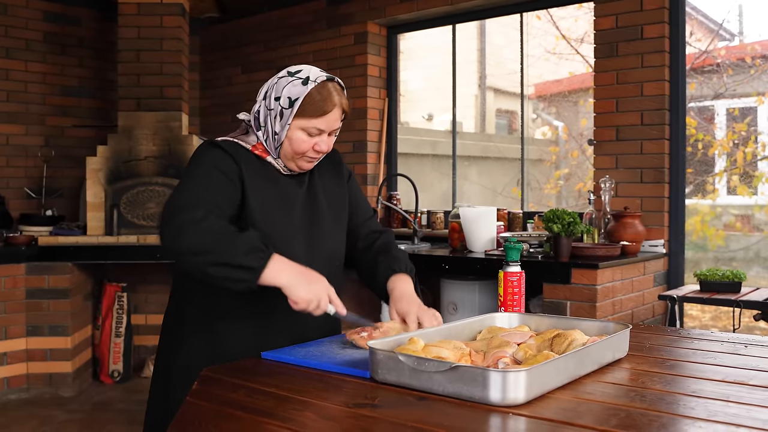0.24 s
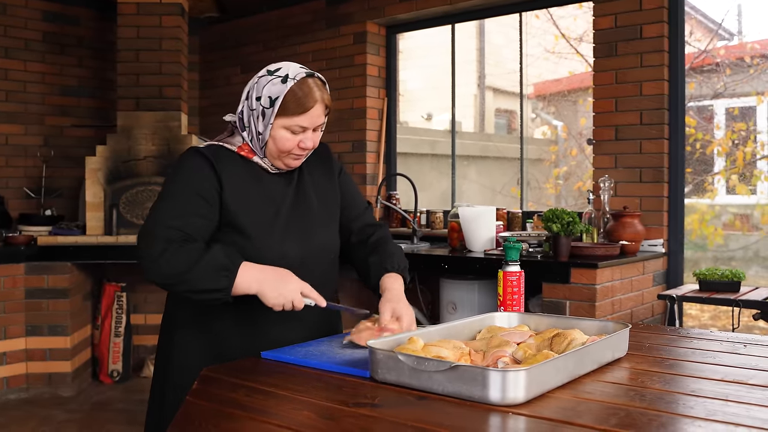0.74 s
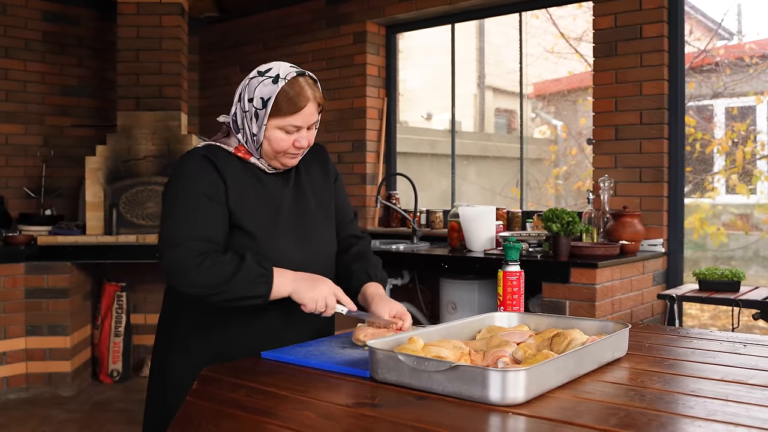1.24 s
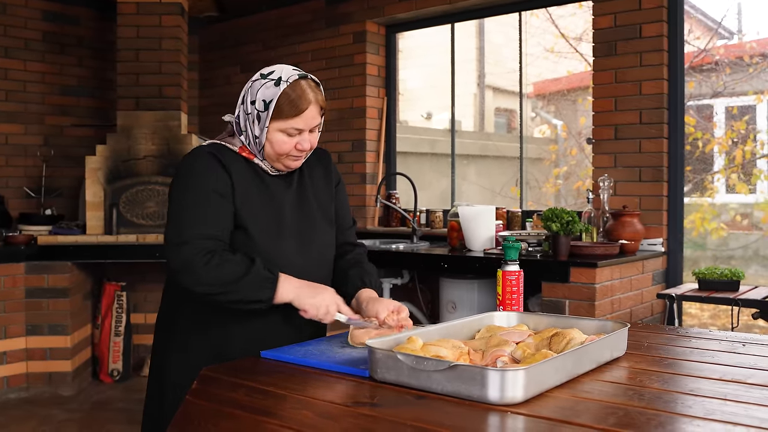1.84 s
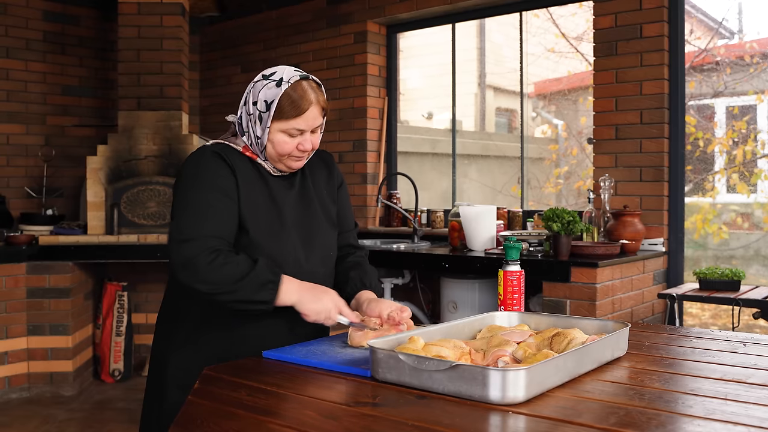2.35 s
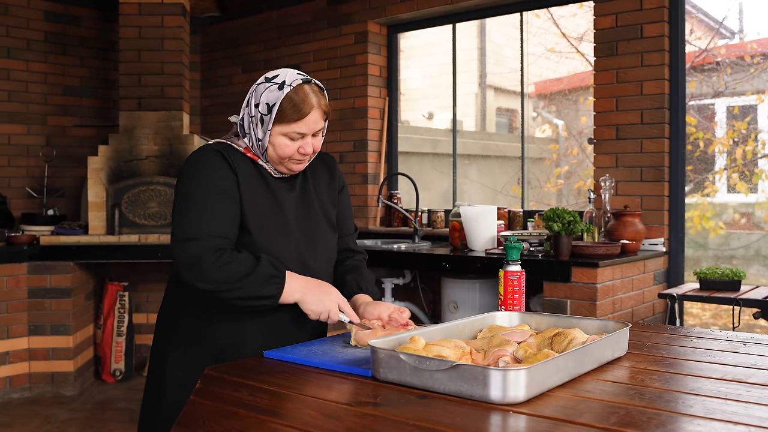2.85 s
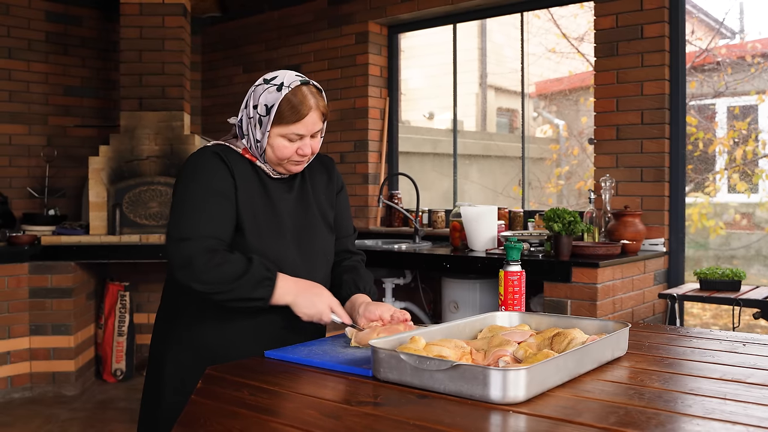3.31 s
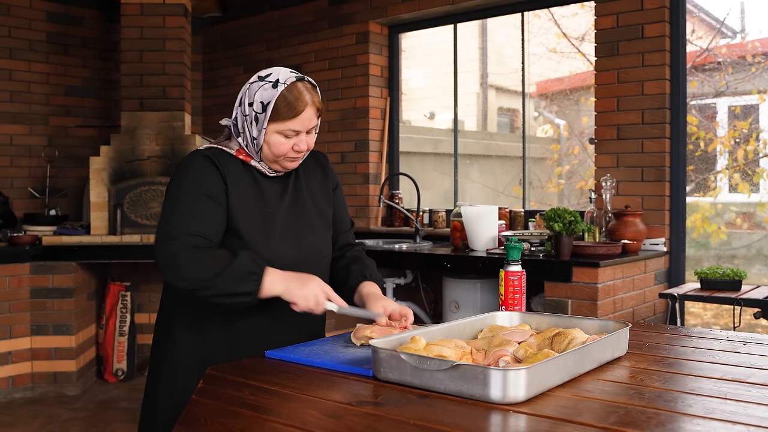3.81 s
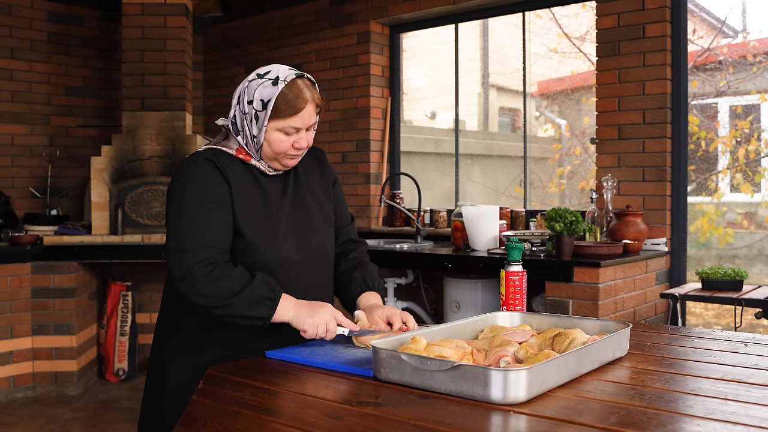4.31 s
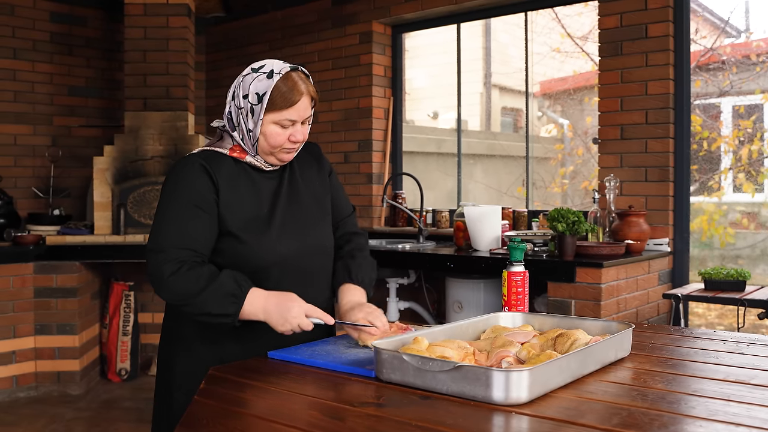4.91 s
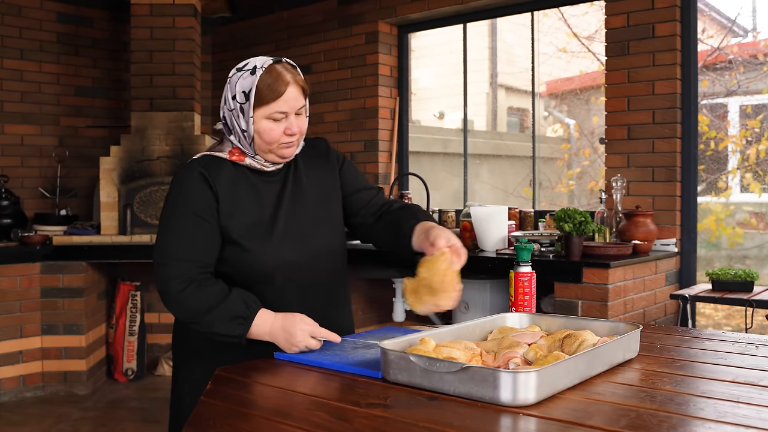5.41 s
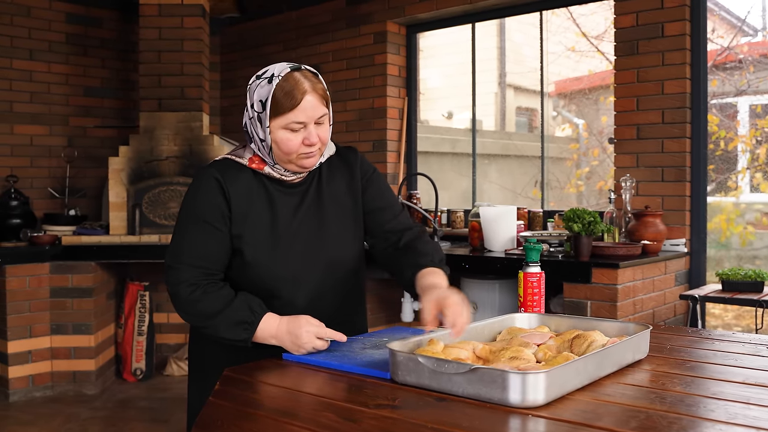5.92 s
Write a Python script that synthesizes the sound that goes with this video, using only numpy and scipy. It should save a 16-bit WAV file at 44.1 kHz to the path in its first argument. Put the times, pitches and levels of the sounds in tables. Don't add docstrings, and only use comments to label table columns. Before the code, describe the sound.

A faint room tone and wide, soft water hiss run throughout, with bright ticking drips at left and right and occasional dull splats. At 0.1 s a hand thumps the wooden table with a light scrape; another thump and low rub come at 0.5 s, with tiny high sparrow notes. A chirp sounds at 0.9 s, then a thump at 1.1 s. Around 1.15 s the yard sound drops away for about 0.05 s and returns. Far whistles begin at 1.8 s. From 2.1 to 2.5 s the knife scrapes and taps the board in quick clusters. Sparrows chirp at right near 2.9, 3.2, 3.8, 4.5 and 5.0 s, while whistles continue until 3.8 s and knife work thins to faint rubs and thumps. At 5.82 s a sharp, loud tray knock cracks, rings and booms off brick, the table humming beneath. Two much softer blows follow near 6.1 s.

```python
import sys
import numpy as np
from scipy import signal
from scipy.fft import rfft, irfft
from scipy.io import wavfile
from scipy.ndimage import uniform_filter1d

SR = 44100
rng = np.random.default_rng(int(sys.argv[2]) if len(sys.argv) > 2 else 0)


def master(y):
    cut = np.clip(np.atleast_2d(y).T, -1, 1)
    pcm = np.round(cut * 32767)
    wavfile.write(sys.argv[1], SR, pcm.astype(np.int16))


def natural_amplitude(level_db):
    exponent = np.asarray(level_db, float) / 20
    return 10 ** exponent


N = 271636

# freq_hz, density_db
ROOM_TONE = [(30, -14), (60, -7), (150, -7.5), (300, -2.5), (1000, -4), (2000, -8.5), (2600, -14),
             (3600, -9.5), (4400, -13.5), (5000, -23), (5800, -33), (16000, -46)]
ROOM_TONE_DB = -69.5
# freq_hz, t60_s
BRICK = [(100, 0.94), (300, 0.58), (700, 0.54), (1400, 0.66), (3000, 0.58), (6000, 0.51), (12000, 1)]

# freq_hz, density_db
YARD_WATER = [(24, -34), (40, -9), (71, -1.5), (209, -5.5), (282, 1), (381, -5.5), (768, -3.5), (2490, -5),
              (3540, -5.5), (6450, -9), (10000, -7.5), (12800, -8), (13800, -11), (15700, -9)]
YARD_WATER_DB = -62
# freq_hz, correlation_0_to_1
LIKENESS = [(60, 0.21), (130, 0.17), (290, 0.7), (640, 0.13), (1400, 0.28), (3100, 0.018), (6800, 0.016),
            (10000, 0.19), (15000, 0.52)]
# time_s, level_db
SPRAY = [(0.0, -68.5), (0.42, -69), (0.66, -68.5), (1.13, -69), (1.53, -67), (2.62, -67.5), (3.0, -67.5),
         (3.7, -67), (3.84, -68), (4.62, -69), (4.97, -68), (5.39, -69.5), (5.8, -67.5)]
# freq_hz, left_minus_right_db
LEAN = [(60, 6.5), (110, 2), (200, 2), (380, -0.5), (700, -1.5), (1290, 1), (2380, 0), (4400, 1.5),
        (8120, 3.5), (15000, 2)]
# freq_hz, left_lead_rad
LEAD = [(0, 0), (3270, .4), (3700, -.2), (4650, 1.3), (5770, -4), (6550, -3.6), (8350, -1.2), (10800, .2),
        (13000, 0)]
# start_s, end_s, level_db
GAP = (1.147, 1.197, -26)

DRIP_DB, DRIPS_PER_S = -75.5, 250
# start_s, peak_db, centre_hz
DROPS = [(0.233, -52, 9100), (0.3205, -44.5, 8440), (0.378, -55, 12700), (0.504, -50, 9630),
         (0.627, -43.5, 10080), (0.6804, -46, 10200), (0.7815, -46, 10050), (0.9247, -46.5, 10300),
         (0.9548, -43, 10100), (1.021, -47, 11630), (5.8285, -41, 14000), (1.634, -48, 9600),
         (2.022, -49, 7380), (2.2013, -47, 11200), (2.3984, -44, 10900), (2.507, -51, 8850),
         (2.603, -46.5, 10800), (2.8, -47, 9900), (3.396, -49, 10200), (3.808, -43, 10800),
         (4.043, -47.5, 7430), (4.21, -45, 12340), (4.335, -41, 11000), (4.7615, -46, 10000),
         (5.017, -43, 11200), (5.112, -43.5, 10040), (5.326, -41, 13300), (5.531, -55, 9380),
         (5.581, -50, 12000), (5.607, -43, 10070), (0.3367, -49, 8500), (.469, -57, 12000),
         (0.548, -46, 10600), (.589, -47, 8040), (.7402, -54, 11000), (0.8115, -45, 10100),
         (.863, -55, 11500), (1.684, -49, 13300), (2.0819, -52, 12200), (2.4777, -51, 9750),
         (2.752, -47, 9500), (3.0754, -50.5, 9510), (3.4211, -59, 12000), (3.5047, -49, 12400),
         (3.9976, -49, 9130), (4.2922, -50, 11700), (4.4, -48, 10660), (4.4512, -54, 12500),
         (4.554, -45, 12700), (4.6376, -52, 9550), (4.6755, -47, 8870), (4.9057, -49, 11100),
         (5.2629, -51, 12700), (5.557, -45.5, 8300), (5.663, -50, 10500), (5.7892, -57, 12800),
         (6.04, -44.5, 10500), (5.979, -50, 12500), (6.023, -48, 11000), (6.05, -47, 14000)]
SPLAT_DB, SPLAT_DB_PER_DB = -8.5, -0.37
# start_s, peak_db, centre_hz
SPLATS = [(0.2318, -50, 5300), (0.378, -47, 4000), (0.4345, -49.5, 5400), (0.5105, -50, 4950),
          (.32, -53, 4600), (0.984, -52.5, 6000), (1.8, -48, 4400), (1.634, -49, 4500), (2.0807, -52, 4800),
          (3.1, -53, 5200), (1.3, -52, 5600), (1.229, -51, 5500), (.524, -54, 4500), (0.44, -53, 4500),
          (3.076, -54, 5700), (5.811, -44, 2800), (3.958, -52, 4500), (3.6, -53, 4500), (4.33, -47, 3640),
          (7.5, -48, 4470), (5.6613, -55, 4800)]

# peak_s, level_db
THUMPS = [(0.082, -60.5), (0.5, -67), (0.565, -65.5), (1.129, -65.5), (1.7, -86), (2.17, -75.5),
          (2.491, -73.5), (2.85, -72.5), (3.05, -81), (3.17, -76.5), (3.57, -73), (3.78, -85), (3.87, -82),
          (4.571, -79.5), (4.88, -69), (5.06, -80), (5.38, -82), (5.5, -73)]
THUMP_RISE_DB_PER_S, THUMP_FALL_DB_PER_S, TABLE_REST_DB = 449, 132.5, -92
# freq_hz, width_hz, level_db
TABLE = [(108, 34, -1.5), (139, 30, 3), (194.3, 37, -0.5), (322, 170, -19.5)]
# start_s, length_s, centre_hz, width_hz, level_db
SCRAPES = [(0.067, 0.19, 3805, 1000, -69.5), (0.517, 0.048, 920, 885, -63), (0.539, 0.054, 594, 497, -65),
           (0.074, .16, 450, 500, -70.5), (0.549, 0.2, 302, 350, -66), (1.281, 0.34, 400, 312, -74.5),
           (2.432, 0.075, 1250, 420, -65), (0.743, 0.12, 3800, 912, -66), (0.85, 0.14, 3820, 694, -73),
           (1.684, 0.14, 4020, 806, -69.5), (2.071, 0.11, 3400, 1120, -61), (2.159, 0.1, 3918, 600, -72),
           (2.194, 0.062, 1810, 302, -65), (2.204, 0.36, 843, 895, -66.5), (3.879, 0.21, 596, 915, -67.5),
           (3.895, 0.096, 3600, 500, -70), (4.208, 0.23, 3640, 1020, -71.5),
           (5.079, 0.069, 3800, 1500, -67.5), (5.664, 0.094, 3340, 2490, -65)]
# start_s, peak_db,
# pitch_hz, t60_s
TAPS = [(0.7, -61, 1500, 0.065), (2.183, -51.5, 772, 0.1), (2.204, -47.5, 675, 0.056),
        (2.214, -49, 1248, 0.046), (2.244, -50, 660, 0.035), (2.5, -60, 670, 0.046),
        (2.304, -62, 721.5, 0.056), (2.328, -59.5, 600, 0.07), (2.7, -65, 1444, 0.18),
        (2.4351, -46, 1215, 0.033), (2.444, -44, 1168, 0.045), (2.44, -55.5, 1400, 0.067),
        (2.468, -52, 1350, 0.03), (2.494, -58, 1200, 0.035), (2.226, -54.5, 660, .03),
        (0.45, -66, 110, .08), (.555, -59.5, 235, .06), (.566, -64, 125, 0.089), (.583, -65, 200, .2),
        (.63, -65, 350, .06), (1.122, -60, 125, .09), (1.122, -66, 250, .06), (1.143, -65, 130, 0.081),
        (1.078, -68, 130, .1), (.07, -63, 90, .3), (5.8165, -42, 2000, .012), (2.262, -61, 690, .12),
        (2.831, -60, 1350, 0.037), (3.669, -49, 1830, 0.007), (3.668, -53, 2450, 0.0047),
        (2.345, -58.5, 730, .04), (2.352, -61, 534, .03), (2.205, -49.5, 1400, 0.027),
        (2.451, -53, 1300, 0.031), (6.03, -47, 401.4, .06), (6.1, -44, 470, 0.054), (6.075, -52, 260, 0.18),
        (6.1, -50, 265, .12)]

# offset_s, length_s, first_hz, last_hz, level_db
CHIRP = [
    (0.064, 0.012, 3345, 3670, -4.5),
    (.082, 0.0165, 3403, 4035, -1.5),
    (0.102, 0.008, 3600, 3400, -8.5),
]
# start_s, level_db, first_stroke_db, pitch_factor
CHIRPS = [(.908, -60, -7, 1.04), (2.85, -59, 1, 1.03), (3.152, -63, -11, 1.02), (3.8, -58, -6, 0.962),
          (4.205, -74, 0, 1.1), (4.545, -61.5, 0, 1.01), (4.971, -60.5, 0, 1.02)]
# start_s, length_s, first_hz, last_hz, level_db
HIGHS = [(.533, .01, 4000, 4700, -72), (.541, .014, 4690, 4600, -70), (0.542, .014, 5200, 5050, -70),
         (0.553, 0.018, 4500, 4320, -64), (.571, .022, 4320, 3910, -68), (0.597, .01, 3650, 3950, -63),
         (.609, .01, 3770, 3950, -68), (.61, .02, 3390, 3030, -70), (.621, 0.015, 3700, 4010, -63),
         (.754, .01, 4350, 4050, -71), (0.901, 0.011, 4320, 4650, -71), (0.911, .034, 4650, 4420, -66),
         (.94, 0.024, 4420, 3640, -68.5), (2.846, .007, 4500, 5300, -71), (2.852, .028, 5350, 4800, -63.5),
         (2.855, .016, 4800, 5050, -70), (2.878, .012, 4760, 4020, -65), (3.148, .008, 4330, 4750, -70),
         (3.152, .014, 5180, 4980, -71), (3.166, .023, 4730, 4130, -65.5), (3.804, .007, 4780, 5280, -64.5),
         (3.808, .034, 5180, 4633, -62.5), (3.842, 0.015, 3880, 3650, -62),
         (4.205, .035, 4370, 3790, -71.5), (4.543, .007, 4690, 5150, -66), (4.548, .024, 5190, 4990, -62),
         (4.563, .018, 4940, 4720, -63), (4.55, .012, 4680, 4760, -67), (4.971, 0.011, 4580, 5160, -64.5),
         (4.972, .025, 5330, 5040, -72), (4.982, 0.021, 4950, 4560, -68.5), (5.006, .008, 4134, 3800, -67),
         (5.06, 0.02, 4620, 4440, -70), (4.58, .02, 3900, 3440, -67), (5.016, 0.012, 3340, 3876, -70)]
# start_s, length_s, first_hz, last_hz, level_db
WHISTLES = [(1.812, 0.066, 1816, 1470, -78), (2.039, 0.068, 2716, 2310, -79), (2.256, .05, 1880, 1681, -83),
            (2.514, 0.062, 2070, 2125, -67), (2.565, 0.058, 2098, 1641, -66),
            (2.69, 0.023, 4560, 4080, -70.5), (2.77, 0.083, 2970, 2530, -78),
            (3.145, 0.047, 1820, 1704, -72.5), (3.295, 0.025, 3140, 3020, -69),
            (3.316, 0.036, 3050, 2970, -72), (3.36, 0.068, 3080, 2950, -72),
            (3.46, .014, 3415, 3570, -71.5), (3.486, 0.019, 3450, 3300, -67),
            (3.484, 0.034, 2080, 2170, -74), (3.514, 0.04, 2173, 2042, -68.5),
            (3.692, 0.013, 2770, 2710, -73), (3.7, 0.04, 2500, 2140, -69.5),
            (3.732, 0.026, 2160, 2600, -71), (3.751, 0.04, 2540, 2690, -70)]

LANDING_S = 5.82055
# start_s, crack_db, ring_db, softness_s
BLOWS = [
    (LANDING_S, -9, -20.5, 0.00039),
    (6.068, -45.5, -33.5, 0.00099),
    (6.107, -45, -32.5, 0.00088),
]
# freq_hz, level_db, t60_s
CRACK = [(495, -22, .047), (961, -3.5, .0087), (1443, 2, .007), (2261, -.5, .0061),
         (3130, -18, .009), (3650, -20, 0.0082), (4440, -23, 0.0087), (5200, -28, .006), (5980, -32, .005),
        (7300, -32, 0.0055), (12500, -42, .004)]
# freq_hz, level_db, t60_s
WALL = (1215, -13, .022)
# freq_hz, level_db, t60_s
TRAY = [(199, 1, 0.23), (256, -6.5, 0.38), (330, -5, 0.35), (474, 6.5, 0.4), (507.4, 9.5, 0.42),
        (602, 6.5, 0.26), (665, 0.5, 0.6), (750, -1, 0.3), (980, 15, 0.27), (1124, 15, 0.35),
        (1190, 15, 0.22), (1230, 14, .3), (1384, 15, 0.3), (1535, 19, 0.08)]
# start_s, freq_hz, level_db, rise_s, t60_s
HUMS = [
    (5.83, 138, -28.5, 0.072, 0.33),
    (6.065, 88, -55, .04, .6),
    (5.821, 100, -47, .01, 0.24),
    (6.061, 140, -41.5, 0.035, 0.49),
]
# freq_hz, density_db
BOOM = [(47, -75), (80, -27), (130, -27), (167, -17.5), (281, -12.5), (400, -9), (506, -2.5), (693, -7),
        (850, -8.5), (990, -3), (1820, -15.5), (2020, -11), (2440, -18), (2750, -21), (3630, -18.5),
        (4600, -28), (7000, -41), (12000, -57), (15600, -102), (22000, -120)]

EDGE_HZ, WIDE_TO_HZ = 15800, 13300
# freq_hz, step_over_band_rms_db
COARSE = [(200, -14.5), (700, -15), (1200, -6.5), (2000, 1.5), (5000, 1), (10000, 1.5), (15500, 3.5)]
BLUR_DB, BLUR_SPREAD_DB, SPARED_DB = -23, 3.5, 10


def evened(x):
    return x / np.sqrt(np.mean(x ** 2) + 1e-20)


def read(points, hz):
    f, value = np.transpose(points)
    return np.interp(np.log(hz + 1), np.log(f + 1), value)


def add(mix, start_s, sound):
    part = mix[round(start_s * SR):][:len(sound)]
    part += sound[:len(part)]


def resonate(x, hz, width_hz):
    turn = np.exp(2j * np.pi * hz * np.arange(len(x)) / SR)
    r = np.exp(-np.pi * width_hz / SR)
    return 2 * (turn * signal.lfilter([1 - r], [1, -r], x / turn)).real


def mode(t, hz, db, t60_s):
    return natural_amplitude(db - 60 * t / t60_s) * np.sin(2 * np.pi * hz * t)


def room(x):
    echoes = np.zeros(SR)
    at = np.arange(200, SR - 20, 20) + rng.integers(0, 20, (SR - 201) // 20)
    echoes[at] = rng.choice([-1., 1.], at.shape)
    hz, t, z = signal.stft(echoes, SR, nperseg=256)
    decay = natural_amplitude(-60 * t / read(BRICK, hz)[:, None])
    tail = signal.istft(z * decay, SR, nperseg=256)[1]
    tail = tail * (1 - np.exp(-np.arange(len(tail)) / SR / 0.0081))
    return signal.fftconvolve(x, tail / np.linalg.norm(tail))[:N]


def hiss(spectrum, same, patchy_db, flicker_db):
    frames, hz = N // 128 + 5, np.fft.rfftfreq(512, 1 / SR)
    a, b, c, d, patches, flicker = rng.standard_normal((frames, 257, 6)).T
    patches = evened(uniform_filter1d(uniform_filter1d(patches, size=8, axis=0), size=25, axis=1))
    flicker = evened(uniform_filter1d(uniform_filter1d(flicker, size=120, axis=0), size=5, axis=1))
    same = np.clip(same(hz), -1, 1)[:, None]
    left = a + 1j * b
    right = same * left + np.sqrt(1 - same ** 2) * (c + 1j * d)
    treble = np.clip(hz / 5000, 0, 1)[:, None]
    z = np.array([left, right]) * natural_amplitude(patchy_db * patches + flicker_db * flicker * treble)
    noise = signal.istft(z, nperseg=512, noverlap=384)[1][:, :N]
    colour = natural_amplitude(read(spectrum, np.fft.rfftfreq(N, 1 / SR)))
    return evened(irfft(rfft(noise) * colour, N))


def room_tone():
    return natural_amplitude(ROOM_TONE_DB) * hiss(ROOM_TONE, np.ones_like, patchy_db=-0.6, flicker_db=1.0)[0]


def splash(hz, cycles):
    t = np.arange(900) / SR
    noise = resonate(rng.standard_normal(900), hz, hz / cycles)
    noise = resonate(noise, hz, 3.5 * hz / cycles)
    burst = noise * (np.exp(-t / .001) + .25 * np.exp(-t / .008)) * np.minimum(t / .0001, 1)
    return burst / abs(burst).max()


def drips():
    size = natural_amplitude(4.3 * np.minimum(rng.exponential(1, N), 4)) * (rng.random(N) < DRIPS_PER_S / SR)
    kind, out = rng.integers(0, 24, N), np.zeros((2, N))
    for k, hz in enumerate(np.geomspace(4000, 14000, num=24)):
        for ear in out:
            add(ear, 0, signal.oaconvolve(size * (kind == k), splash(hz, cycles=2.6)))
    out = natural_amplitude(DRIP_DB) * evened(out)
    for start_s, db, hz in DROPS:
        splat = natural_amplitude(SPLAT_DB + SPLAT_DB_PER_DB * (db + 48.5))
        for ear in out:
            burst = splash(hz, cycles=3.8) + splat * splash(4800, cycles=1.9)
            add(ear, start_s, natural_amplitude(db - 4.0) * burst)
    return out + 0.12 * out[::-1]


def water():
    t, hz = np.arange(N) / SR, np.fft.rfftfreq(N, 1 / SR)
    spray = hiss(YARD_WATER, lambda f: read(LIKENESS, f), patchy_db=1.8, flicker_db=1.5)
    out = natural_amplitude(YARD_WATER_DB) * spray + drips()
    out = out * natural_amplitude(np.interp(t, *np.transpose(SPRAY)) - np.mean(SPRAY, axis=0)[1])
    tilt = natural_amplitude(read(LEAN, hz) / 2) * np.exp(.5j * read(LEAD, hz))
    return irfft(rfft(out) * [tilt, 1 / tilt], N)


def thumps():
    push, t = rng.standard_normal(N), np.arange(N) / SR
    wood = sum(natural_amplitude(db) * resonate(resonate(push, hz, w), hz, 2 * w) for hz, w, db in TABLE)
    shake_db = np.full(N, float(TABLE_REST_DB))
    for peak_s, db in THUMPS:
        slope_db = np.minimum(THUMP_RISE_DB_PER_S * (t - peak_s), THUMP_FALL_DB_PER_S * (peak_s - t))
        shake_db = np.maximum(shake_db, db + slope_db)
    return evened(wood) * natural_amplitude(shake_db)


def scrapes():
    out = np.zeros(N)
    for start_s, length_s, hz, width_hz, db in SCRAPES:
        u = np.linspace(0, 1, round(length_s * SR))
        noise, grit = rng.standard_normal((16000, 2))[:len(u)].T
        grit = natural_amplitude(1.7 * evened(uniform_filter1d(grit, size=150)))
        band = resonate(resonate(noise * grit, hz, width_hz), hz, 1.7 * width_hz)
        add(out, start_s, natural_amplitude(db) * evened(band) * np.minimum(u / 0.12, 1) * (1 - u ** 2))
    return out


def taps():
    t, out = np.arange(6000) / SR, np.zeros(N)
    for start_s, db, hz, t60_s in TAPS:
        rise = 1 - np.exp(-(t / (0.11 * t60_s)) ** 2)
        blur = evened(resonate(rng.standard_normal(6000), hz, 0.18 * hz))
        damp = np.sin(2 * np.pi * hz * t) + .25 * blur
        add(out, start_s, natural_amplitude(db + 6.0 - 60 * t / t60_s) * rise * damp)
    return out


def splats():
    out, t = np.zeros((2, N)), np.arange(900) / SR
    for start_s, db, hz in SPLATS:
        tick = np.sin(2 * np.pi * hz * t) * np.exp(1 - t / .0003) * t / .0003
        for ear in out:
            add(ear, start_s, natural_amplitude(db) * (0.65 * tick + 0.4 * splash(hz, cycles=2.5)))
    return out


def stroke(length_s, first_hz, last_hz, db, rough):
    u = np.linspace(-1, 1, round(length_s * SR))
    bow_hz = (1 - u ** 2) * 0.16 * max(first_hz - last_hz, 0)
    hz = (first_hz + last_hz) / 2 + u * (last_hz - first_hz) / 2 + bow_hz
    tremble = 1 + rough * evened(uniform_filter1d(rng.standard_normal(6000), size=150))[:len(u)]
    tone = np.sin(2 * np.pi * np.cumsum(hz) / SR)
    return natural_amplitude(db + 3) * tremble * tone * signal.windows.tukey(len(u), .35)


def birds():
    sparrow, far = np.zeros((2, N))
    for start_s, db, first_db, pitch in CHIRPS:
        for k, (offset_s, length_s, first_hz, last_hz, part_db) in enumerate(CHIRP):
            level_db = db + part_db + first_db * (k == 0)
            note = stroke(length_s, first_hz * pitch, last_hz * pitch, level_db, rough=0.32)
            add(sparrow, start_s + offset_s, note)
    for start_s, *note in HIGHS:
        add(sparrow, start_s, stroke(*note, rough=0.3))
    for start_s, *note in WHISTLES:
        add(far, start_s, stroke(*note, rough=.12))
    sparrow = sparrow + 0.16 * np.roll(sparrow, round(.011 * SR)) + natural_amplitude(-10.5) * room(sparrow)
    far = far + natural_amplitude(-12) * room(far)
    left = natural_amplitude(-4) * np.roll(sparrow, 28) + np.roll(far, 2)
    return np.array([left, natural_amplitude(3) * sparrow + natural_amplitude(2.5) * far])


def yard():
    t = np.arange(N) / SR
    shut = np.clip(np.minimum(t - GAP[0], GAP[1] - t) / 0.0012, 0, 1)
    return (water() + splats() + birds()) * natural_amplitude(GAP[2] * shut)


def graze():
    noise = rng.standard_normal(220) * np.linspace(.3, 1, 220) * signal.windows.tukey(220, .3)
    low = resonate(resonate(noise, 1900, 1000), 2100, 2200)
    high = resonate(resonate(resonate(noise, 4200, 4300), 4900, 5300), 5000, 7400)
    return natural_amplitude(-28.0) * (low + 0.83 * np.linspace(0, 1, 220) ** 2 * high)


def rim_crack(t):
    crack = sum(mode(t, *rim) * (-1) ** k for k, rim in enumerate(CRACK))
    crack = (crack + mode(t, *WALL)) * (1 - np.exp(-(t / .00145) ** 2))
    return crack / abs(crack).max()


def sheet_ring(t, soft_s):
    ring = sum(mode(t, hz, db, t60_s) / (1 + (2 * np.pi * hz * soft_s) ** 2) for hz, db, t60_s in TRAY)
    return ring * (1 - np.exp(-t / (8 * soft_s)))


def wall_boom(click):
    hz = abs(np.fft.fftfreq(8192, 1 / SR))
    gain = np.log(natural_amplitude(np.maximum(read(BOOM, hz), -90)))
    colour = np.fft.ifft(np.exp(np.conj(signal.hilbert(gain)))).real[:4096]
    return signal.oaconvolve(click, colour / np.linalg.norm(colour))[:N]


def tray():
    t, out, click = np.arange(SR // 2) / SR, np.zeros(N), np.zeros(N)
    add(out, LANDING_S - .0045, graze())
    crack = rim_crack(t)
    for start_s, crack_db, ring_db, soft_s in BLOWS:
        add(out, start_s, natural_amplitude(crack_db) * crack)
        add(out, start_s, natural_amplitude(ring_db - 13.5) * sheet_ring(t, soft_s))
        click[round(start_s * SR)] = natural_amplitude(crack_db)
    for start_s, hz, db, rise_s, t60_s in HUMS:
        add(out, start_s, mode(t, hz, db, t60_s) * (1 - np.exp(-(t / rise_s) ** 2)))
    out = signal.lfilter(*signal.butter(N=2, Wn=80, btype="high", fs=SR), out)
    return -out, -wall_boom(click)


def scene():
    near, tapped = thumps() + scrapes(), taps()
    knock, boom = tray()
    sent = natural_amplitude(-5) * near + natural_amplitude(-14) * tapped + natural_amplitude(-22.0) * knock + natural_amplitude(14.5) * boom
    return yard() + room_tone() + near + tapped + knock + room(sent)


def thinned(dry):
    window = np.sin(np.pi * (np.arange(2048) + .5) / 2048)
    mid_side = [dry[0] + dry[1], dry[0] - dry[1]]
    hz, t, z = signal.stft(mid_side, SR, window, nperseg=2048, noverlap=1024)
    band = np.arange(1025) // 8
    power_db = 10 * np.log10(np.add.reduceat(abs(z) ** 2, np.arange(0, 1025, 8), axis=1) + 1e-20)
    dip_db = (power_db - signal.medfilt(power_db, kernel_size=(1, 1, 11)))[:, band]
    power_db = power_db[:, band]
    kept = (dip_db > np.array([-4.6, -3.6])[:, None, None]) | (dip_db < -10) | (hz < 6500)[:, None]
    top_db = 10 * np.log10((abs(z[1, hz > WIDE_TO_HZ]) ** 2).sum(0) + 1e-20)
    kept[1] &= (hz < WIDE_TO_HZ)[:, None] | (top_db > signal.medfilt(top_db, 41) + 1.1)
    kept[1] &= power_db[1] > power_db[0] - 19
    z = z * np.maximum(kept, natural_amplitude(-28)) * (hz < EDGE_HZ)[:, None] / 2
    return signal.istft(z, SR, window, nperseg=2048, noverlap=1024)[1][:, :N]


def stepped(x):
    n, k, frames = np.arange(2048) + .5, np.arange(1024) + .5, N // 1024 + 3
    at_s = (np.arange(frames) * 1024 - 780) / SR
    basis = np.sin(np.pi * n / 2048)[:, None] * np.cos(np.pi / 1024 * np.outer(n + 512, k)) / np.sqrt(512)
    padded = np.pad(x, ((0, 0), (1804, frames * 1024 - 780 - N))).reshape(2, -1, 1024)
    lines = np.concatenate([padded[:, :-1], padded[:, 1:]], axis=2) @ basis
    rms = 1.48 * np.median(abs(lines.reshape(2, frames, 64, 16)), axis=3) + 1e-12
    rms = np.repeat(rms, 16, axis=2)
    step = rms * natural_amplitude(read(COARSE, k * SR / 2048))
    rounded = np.sign(lines) * step * np.floor(abs(lines / step) ** .75 + .4054) ** (4 / 3)
    blur = natural_amplitude(BLUR_DB + BLUR_SPREAD_DB * rng.standard_normal((frames, 1)))
    rounded += rms * blur * rng.standard_normal(lines.shape)
    level = np.sqrt((lines ** 2).mean((0, 2)))
    spared = (level > natural_amplitude(SPARED_DB) * np.median(level)) | (abs(at_s - np.mean(GAP[:2])) < .05)
    pieces = np.where(spared[:, None], lines, rounded) @ basis.T
    return (pieces[:, 1:, :1024] + pieces[:, :-1, 1024:]).reshape(2, -1)[:, 780:780 + N]


def roll_off(x):
    return signal.sosfilt(signal.butter(12, 16040, fs=SR, output="sos"), x)


def record(dry):
    mid, side = stepped(thinned(dry))
    return roll_off(np.array([mid + side, mid - side]))


dry = scene()
out = record(dry)
master(out)
```